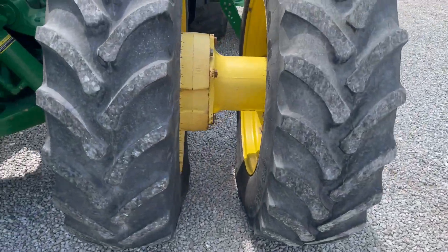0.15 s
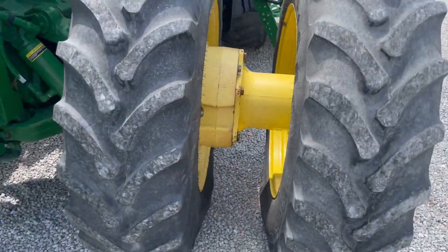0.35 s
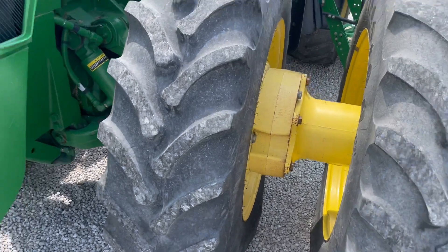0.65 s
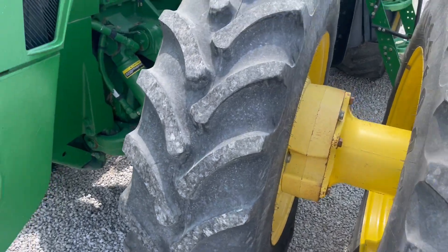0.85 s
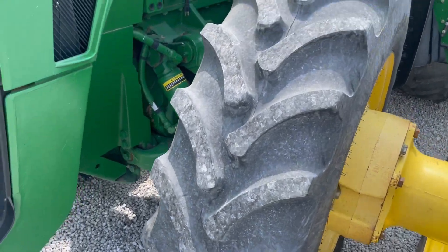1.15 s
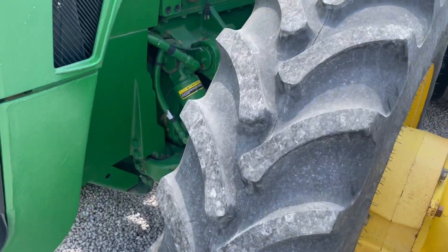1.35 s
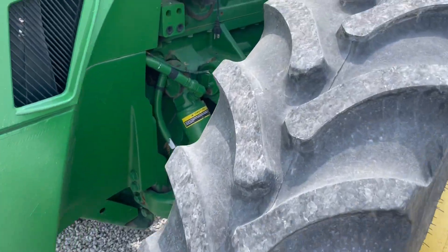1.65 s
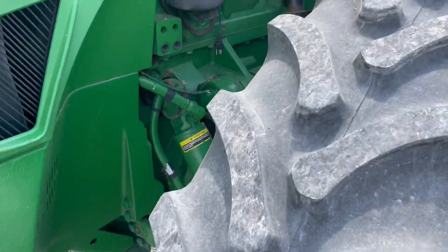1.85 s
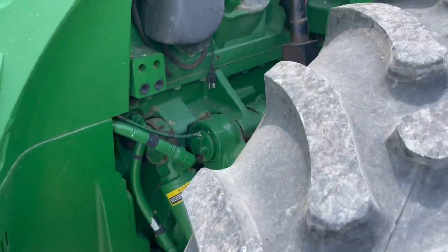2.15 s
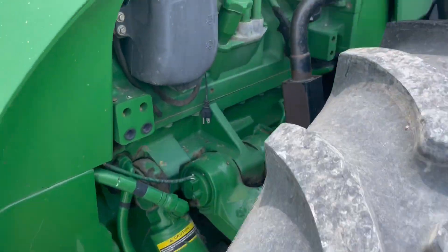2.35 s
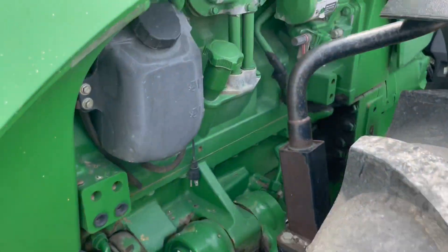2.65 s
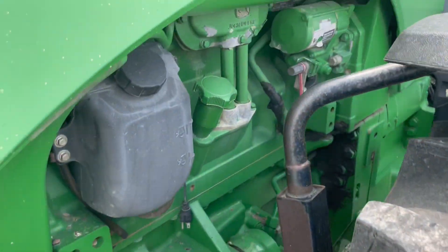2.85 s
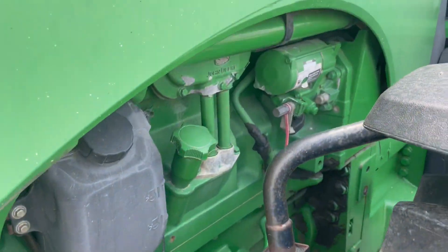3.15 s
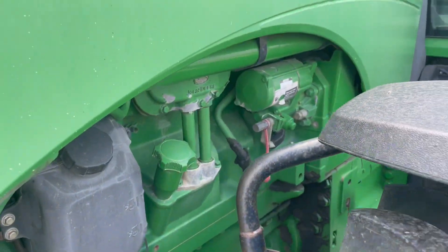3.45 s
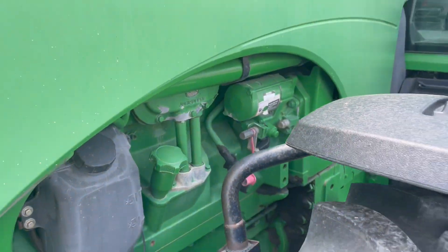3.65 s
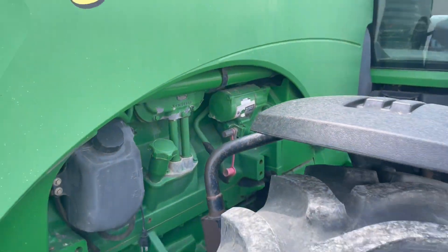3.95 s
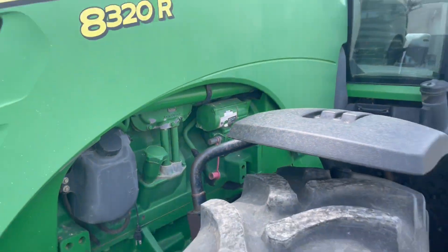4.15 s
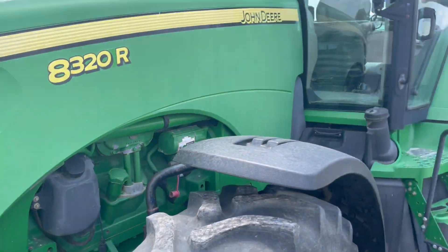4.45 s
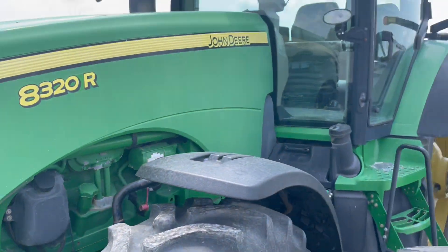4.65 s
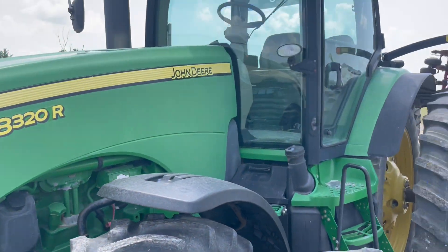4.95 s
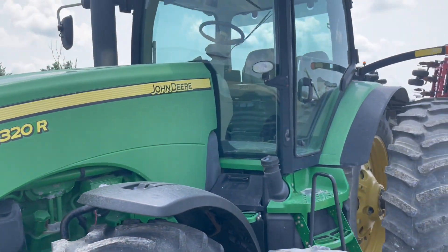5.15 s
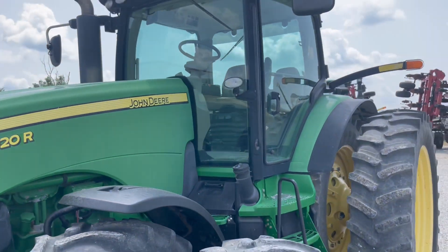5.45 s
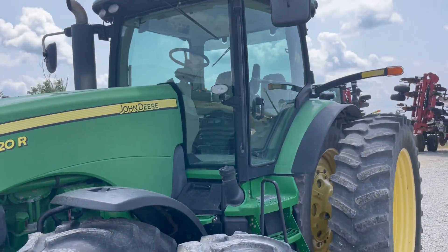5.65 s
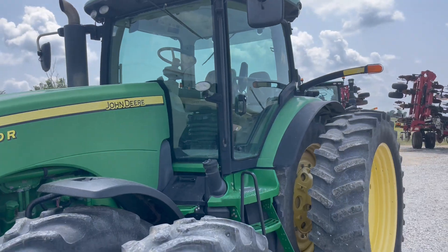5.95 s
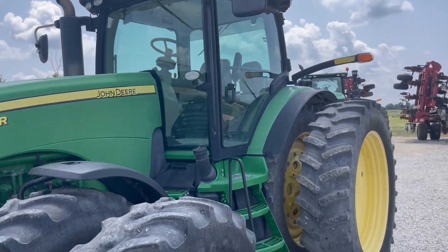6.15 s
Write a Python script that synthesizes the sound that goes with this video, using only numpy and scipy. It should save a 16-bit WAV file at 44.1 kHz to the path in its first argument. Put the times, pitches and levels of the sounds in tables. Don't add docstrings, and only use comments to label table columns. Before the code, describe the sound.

A large diesel engine idles steadily, close up. Its cooling fan hums low and roars with air, growing as the phone approaches, while metallic clatter and a fine whine brighten. Midway the fan's outflow hits the microphone, with booming, distorted buffets and dry crackling pops. The fan roar drops away sharply, gusts fade, and a distant-sounding soft idle remains, with a modest swell of fan rush near the end.

```python
import sys
import numpy as np
from scipy import signal
from scipy.fft import rfft, irfft, next_fast_len
from scipy.io import wavfile

SR = 44100
rng = np.random.default_rng(int(sys.argv[2]) if len(sys.argv) > 2 else 0)


def generate_wav(sig):
    pcm = np.round(np.clip(np.atleast_2d(sig).T, -1, 1) * 32767).astype(np.int16)
    wavfile.write(sys.argv[1], SR, pcm)


def rack_gain(trim_db):
    fader = np.asarray(trim_db, float)
    return 10 ** (fader / 20)


N = 277830
TIME = np.arange(N) / SR
SIZE = next_fast_len(N)
HZ = np.maximum(np.arange(SIZE // 2 + 1) * SR / SIZE, 1)
FIRING_HZ, BLADE_HZ = 45.0, 114.55


def in_time(rows):
    s, *columns = np.transpose(rows)
    return [np.interp(TIME, s, column) for column in columns]


def window(start_s, end_s, fade_s):
    return np.clip(np.minimum(TIME - start_s, end_s - TIME) / fade_s, 0, 1)


def at_hz(points, hz):
    table_hz, values = np.transpose(points)
    return np.interp(np.log(hz), np.log(table_hz), values)


def drift(rate_hz):
    r = np.exp(-80 * np.pi * rate_hz / SR)
    slow = signal.lfilter([1], [1, -2 * r, r * r], rng.standard_normal(N // 40 + 2002))[2000:]
    return np.interp(np.arange(N) / 40, np.arange(len(slow)), slow / slow.std())


def banded_noise(colour_db, levels, centres, shape):
    spectrum = rfft(rng.standard_normal((2, SIZE))) * rack_gain(colour_db)
    power = np.mean(np.abs(spectrum) ** 2, axis=0) * 2 / SIZE ** 2
    gains = np.array([db - 10 * np.log10(power[(HZ > lo) & (HZ < hi)].sum()) for lo, hi, db in levels])
    anchors = np.log([lo * hi for lo, hi, db in levels]) / 2
    out = np.zeros((2, N))
    for k, hz in enumerate(centres):
        share = np.interp(np.log(HZ), np.log(centres), np.arange(len(centres)) == k)
        blend = [np.interp(np.log(hz), anchors, row) for row in np.eye(len(levels))]
        band = irfft(spectrum * share, SIZE)[:, :N]
        out += band * rack_gain(blend @ gains) * shape(hz)
    return out


def spread(pair, alike, lead, pan_db):
    common, apart = rfft(pair, SIZE)
    alike = np.clip(alike, 0, 1)
    common = common * np.sqrt((1 + alike) / 2)
    apart = apart * np.sqrt((1 - alike) / 2)
    turn = np.exp(.5j * lead) * rack_gain(pan_db / 2)
    return irfft(np.array([(common + apart) * turn, (common - apart) / turn]), SIZE)[:, :N]


def rumble():
    thinned_from_s = 3.2
    return np.where(TIME < thinned_from_s, -28, -53.5 + 5 * (TIME - thinned_from_s))


# t/s, blade tone level/dB, airflow level/dB
FAN_LEVELS = [(0.0, -15.5, -26), (1.0, -14.5, -24), (2.1, -12, -22.5), (2.6, -16, -22.5), (2.75, -24, -23),
              (3.1, -18, -28.5), (3.25, -33, -45), (3.85, -40, -44.5), (4.1, -36, -47), (4.6, -31, -49),
              (4.76, -32, -36), (4.95, -24, -34), (5.2, -28, -34.5), (5.5, -27, -35.5), (5.8, -29.5, -35),
              (6.3, -32.5, -38)]
# multiple of the blade rate, level over the first/dB
BLADE_PARTIALS = [(3, -21.5), (4, -23.5), (5, -19), (7, -25)]
# f/Hz, level per Hz/dB
RUSH_COLOUR = [(25, -50), (48, -24), (62, -6), (95, -5), (160, 0), (300, -1), (480, -6), (620, -6),
               (800, -10), (1200, -14), (1700, -26), (3000, -40)]


def fan():
    first_db, air_db = in_time(FAN_LEVELS)
    second_db = air_db + 0.95 - 7 * window(1.9, 4.7, fade_s=.26)
    phase = 2 * np.pi * np.cumsum(BLADE_HZ + .2 * drift(3.0)) / SR
    tone = rack_gain(first_db + 0.49 * drift(5.4)) * np.cos(phase)
    tone += rack_gain(second_db + .8 * drift(8)) * np.cos(2 * phase + .6 + .2 * drift(3.0))
    for multiple, db in BLADE_PARTIALS:
        level = rack_gain(first_db + db + 1.5 * drift(4.1))
        tone += level * np.cos(multiple * phase + .9 * drift(2.73))
    swell, chop = drift(9.9), np.cos(phase)
    levels = [(55, 100, rumble() - 1), (135, 215, air_db), (360, 800, air_db + 0.9)]
    rush = banded_noise(at_hz(RUSH_COLOUR, HZ), levels, np.geomspace(40, 2000, num=9),
                        lambda hz: rack_gain(0.37 * swell + 1.5 * drift(22) + 1.57 * chop - 0.05))
    tone_apart = 1.3 * np.roll(tone, 96)
    return rush + np.sqrt(2) * np.array([tone, tone_apart])


# t/s, distance/m
WALK = [
    (0, 2.6),
    (1.5, 2.0),
    (3.0, 1.0),
    (4.0, 1.7),
    (6.3, 3.0),
]


def firing_count():
    distance_m, = in_time(WALK)
    return (TIME - (distance_m - 1.6) / 343) * FIRING_HZ + 6


# t/s, clatter level/dB
BLOCK_LEVEL = [(0.0, -37), (0.9, -35.5), (1.2, -33.5), (2.0, -31.5), (2.2, -29.5), (2.8, -31), (2.9, -36),
               (3.1, -46.5), (3.7, -43), (3.82, -42.5), (4.17, -46), (4.22, -41), (4.6, -43), (5.3, -46),
               (5.7, -47), (6.3, -49)]
# f/Hz, level per Hz/dB
BLOCK_COLOUR = [(500, -1), (1100, 1), (1500, -2.5), (1800, -3.5), (2150, -3.5), (3000, -8), (4300, -6.5),
                (4800, -9.5), (5900, -11), (8200, -16), (9200, -12), (11200, -11), (12700, -15),
                (15200, -13)]
CASTING_HZ = [803, 1951, 2183, 2320, 2802, 3283, 4073, 4289, 4450, 5033, 5332, 5700]
# width/Hz, level/dB
CASTING_MODES = [(22, 5), (40, 6), (40, 5), (30, 3), (38, 5), (24, 4.5), (30, 4.5), (34, 4.5), (70, 4),
                 (30, 3), (38, 4), (40, 3)]
CYLINDERS_DB = [4, 1, 1.5, 3, 1, 1.5]
# f/Hz, tick power over steady power
TICK_DEPTH = [(800, .2), (2000, 0.37), (5000, 0.88), (11000, 6.4)]


def block_clatter(firings):
    which, age_s = firings.astype(int), firings % 1 / FIRING_HZ
    strength = rack_gain(np.resize(CYLINDERS_DB, 400) + .9 * rng.standard_normal(400)) ** 2
    tick = strength[which] * np.exp(-age_s / .0065) * (1 - np.exp(-age_s / .002))
    colour = at_hz(BLOCK_COLOUR, HZ) - 10 * np.log10(1 + (110 / HZ) ** 4)
    for hz, (width_hz, db) in zip(CASTING_HZ, CASTING_MODES):
        colour = colour + db / (1 + (2 * (HZ - hz) / width_hz) ** 2)
    clatter_db, = in_time(BLOCK_LEVEL)
    swell, rattle = drift(11), drift(61)

    def gate(hz):
        power = 1 + at_hz(TICK_DEPTH, hz) * tick
        return np.sqrt(power / power.mean()) * rack_gain(0.45 * rattle + 0.11 * swell + 1.2 * drift(9.7))

    levels = [(1177, 2080, clatter_db + 5.4), (3760, 22000, clatter_db + 2.0), (9250, 12800, clatter_db - 7.61)]
    return banded_noise(colour, levels, np.geomspace(700, 14000, num=9), gate)


# start t/s, end t/s, whine level/dB
PUMP_SEEN = [
    (0.55, 2.04, -31),
    (4.22, 5.55, -42),
]
# multiple of the firing rate, level/dB
WHINE = [(19, -6.5), (24, 0), (26, -7.5), (28, -9)]


def pump_whine(firings):
    whine = rack_gain(in_time(BLOCK_LEVEL)[0] - 7)
    for start_s, end_s, db in PUMP_SEEN:
        whine = whine + rack_gain(db) * window(start_s, end_s, fade_s=.065)
    tones = np.zeros(N)
    for multiple, db in WHINE:
        level = whine * rack_gain(db - 1.5 + 1.3 * drift(5))
        tones += level * np.cos(2 * np.pi * multiple * firings + .6 * drift(5))
    return tones


def engine():
    firings = firing_count()
    hum = rack_gain(rumble() - 3) * np.cos(2 * np.pi * firings + .3)
    tones = hum + pump_whine(firings)
    return block_clatter(firings) + np.sqrt(2) * tones * [[1], [.3]]


# t/s, strength level/dB, sharpness level/dB
GUSTS = [
    (2.33, -39, -3),
    (2.44, -15, -9.5),
    (3.12, -12, -1.5),
    (3.2, -27, 5),
    (3.37, -24.5, 1),
    (3.46, -20.5, 3),
    (3.64, -26.5, 0),
    (3.7, -27, -26),
    (3.9, -49, -3),
]
# f/Hz, level per Hz/dB
GUST_COLOUR = [(20, -37), (40, 2.5), (70, 6), (130, -0.5), (300, -11), (600, -12), (1200, -26.5),
               (2500, -40), (5000, -80)]
# f/Hz, likeness 0-1
GUST_LIKENESS = [(30, 1), (300, 0.69), (800, 0.42), (1500, .3)]


def gusts():
    thud_db, sharp_db = in_time(GUSTS)
    flutter_db = thud_db - 1.5 + sharp_db
    rasp_db = thud_db - 14.5 + 2 * sharp_db
    present = np.interp(TIME, [2.3, 2.5, 3.72, 3.88], [0, 1, 1, 0])
    lump = drift(35)
    levels = [(25, 100, thud_db), (250, 800, flutter_db), (1000, 2200, rasp_db)]
    air = banded_noise(at_hz(GUST_COLOUR, HZ), levels, np.geomspace(30, 3000, num=8),
                       lambda hz: rack_gain((1.2 + .3 * np.log2(hz / 30)) * lump + 2.0 * drift(40) - 1))
    return present * spread(air, at_hz(GUST_LIKENESS, HZ), -.35 * np.minimum(HZ / 700, 2), 0.92)


# t/s, peak level/dB, f/Hz
THUMPS = [(2.402, -3, 115), (2.446, -2, 125), (2.519, -7, 111), (2.594, -5, 98.7), (2.628, -20, 125),
          (2.688, 2, 142), (2.761, 4.5, 103), (2.813, -3, 108), (2.855, 2, 90), (2.892, 4, 132),
          (2.954, -1, 108), (3.026, -2, 130), (3.065, -1, 65.4), (3.104, -9, 80), (3.133, -1, 220),
          (3.301, -9, 84.5), (3.402, -15, 70), (3.459, -6, 117), (3.531, -10, 106), (3.58, -16, 70),
          (3.661, -11, 133), (3.719, -23, 64.6), (3.79, -20, 67.3)]


def thumps():
    t60_s, start_over, sag_s = 0.053, 1.35, 0.0048
    out, age = np.zeros(N), np.arange(6000) / SR
    bent = age + start_over * sag_s * (1 - np.exp(-age / sag_s))
    envelope = rack_gain(-60 * age / t60_s) * (1 - np.exp(-age / 0.0016))
    for s, db, hz in THUMPS:
        at = round(s * SR)
        out[at:at + len(age)] += rack_gain(db + 2.5) * np.sin(2 * np.pi * hz * bent) * envelope
    return out * rack_gain(np.array([[.5], [-.5]]))


# t/s, peak level/dB, low part level/dB, left-right level/dB
SNAPS = [(2.4495, -13, -16, 5), (2.5794, -10, -9, 12), (2.6881, -18, -10.5, 1.5), (2.78, -12, -10, 7),
         (2.8461, -1, -5, 4), (2.8776, -20, -9, 4), (2.9186, -12, -12.5, 10), (2.963, -9, -8, 7),
         (3.0193, -6, -4.5, 4), (3.0295, -14, -13, 10), (3.0664, -23, -9.5, 4), (3.097, -20, -13.5, -2),
         (3.131, -26, -23, 1), (3.2175, -31, -9, 2), (3.238, -7.5, -10.5, 10), (3.2554, -16, -37, 3),
         (3.3438, -9, -21, 5), (3.4048, -12.5, -25, 7), (3.431, -17, -19, 7), (3.4594, -14, -21, 7),
         (3.493, -10.5, -34, 5), (3.5239, -14, -22, 1), (3.5694, -10.5, -30, 4), (3.5828, -20, -16, 0),
         (3.6601, -14.5, -20.5, 6)]


def snaps():
    out, age = np.zeros((2, N)), np.arange(1500) / SR
    dull = signal.butter(3, [220, 1050], "band", fs=SR, output="sos")
    soft = signal.butter(2, 3800, fs=SR, output="sos")
    bright = signal.butter(2, [700, 1800], "band", fs=SR, output="sos")
    edge_shape = np.exp(-age / .0035) * (1 - np.exp(-age / .001))
    puff_shape = np.exp(-age / .005) * (1 - np.exp(-age / .002))
    noises = rng.standard_normal((len(SNAPS), 3, len(age)))
    for (s, db, low_db, pan_db), (common, *own) in zip(SNAPS, noises):
        air = signal.sosfilt(soft, common + .6 * np.array(own))
        edge = signal.sosfilt(bright, air * edge_shape)
        puff = signal.sosfilt(dull, air * puff_shape)
        snap = rack_gain(db) * edge / np.abs(edge).max() + rack_gain(low_db + 5) * puff / np.abs(puff).max()
        at = round(s * SR)
        out[:, at:at + len(age)] += rack_gain(pan_db / 2 * np.array([[1], [-1]])) * snap
    return out


# f/Hz, likeness 0-1, left phase lead/rad, left-right level/dB
PORTS = [(40, .97, 0, -.5), (200, .95, .25, -1), (700, .72, .6, 1.5), (1200, .72, .8, .5),
         (1750, .1, 1.5, .5), (2100, .55, -.1, 1), (2900, .55, .7, 1), (4000, .72, -.1, 2),
         (5200, .6, .6, 1.5), (6000, .68, -.2, 1), (7000, .8, -1.5, .5), (8250, .9, -3.14, 0),
         (11650, .9, -6.28, 0), (15300, .95, -9.42, 0)]


def scene():
    hz, *columns = np.transpose(PORTS)
    alike, lead, pan_db = [np.interp(HZ, hz, column) for column in columns]
    heard = spread(fan() + engine(), alike, lead, pan_db)
    return heard + gusts() + thumps() + snaps()


def joint_stereo(x, gap_db):
    _, _, z = signal.stft([x[0] + x[1], x[0] - x[1]], nperseg=2048, noverlap=1024)
    band = np.arange(z.shape[1]) // 16
    power = np.add.reduceat(np.abs(z) ** 2, np.arange(0, z.shape[1], 16), axis=1)
    kept = power > power[::-1] * rack_gain(-gap_db) ** 2
    kept[:, :15] = True
    mid, side = signal.istft(z * kept[:, band], nperseg=2048, noverlap=1024)[1][:, :N]
    return np.array([mid + side, mid - side]) / 2


def roll_off(x):
    return signal.sosfilt(signal.butter(12, 15640, fs=SR, output="sos"), x)


def record(dry):
    rumble_cut = signal.butter(4, 36, "high", fs=SR, output="sos")
    steady = signal.sosfilt(rumble_cut, np.tanh(dry))
    mix = joint_stereo(np.clip(steady, -.94, .94), gap_db=6.8)
    return roll_off(mix)


dry = scene()
out = record(dry)
generate_wav(out)
```